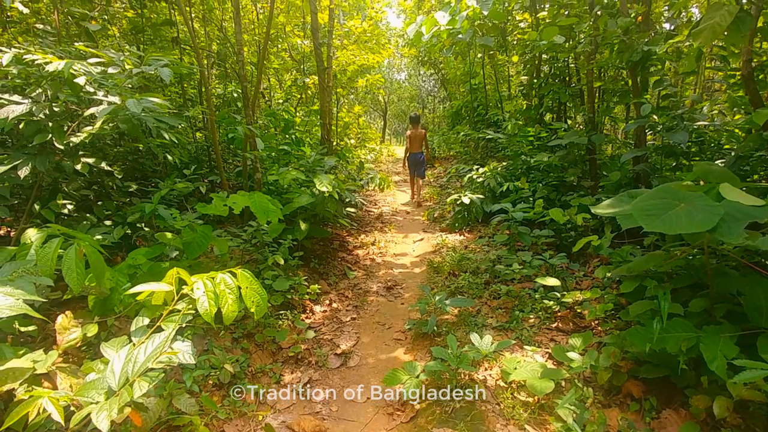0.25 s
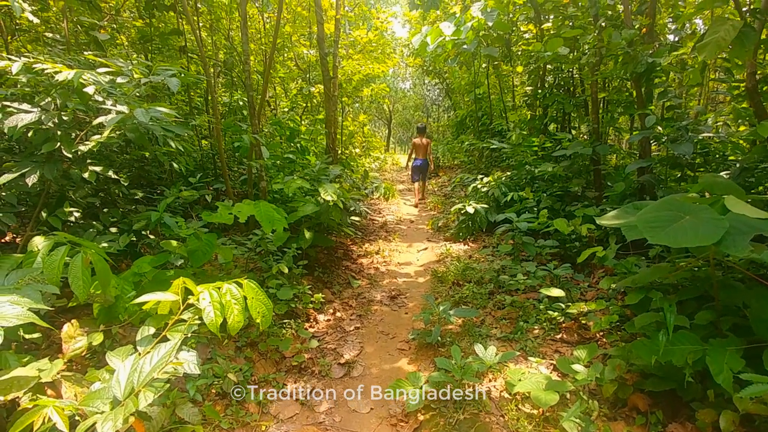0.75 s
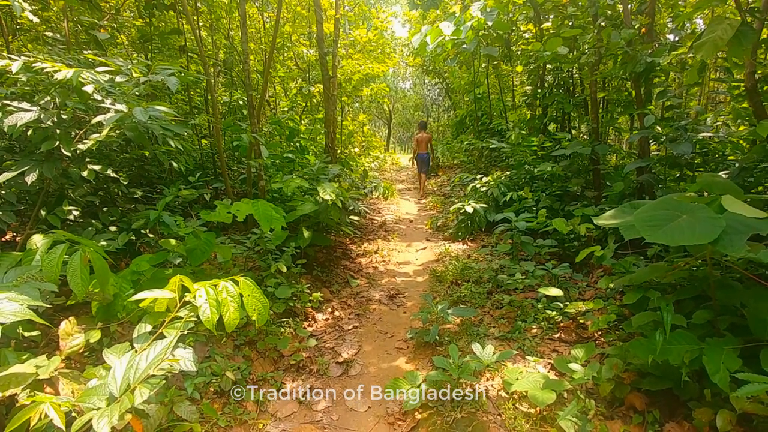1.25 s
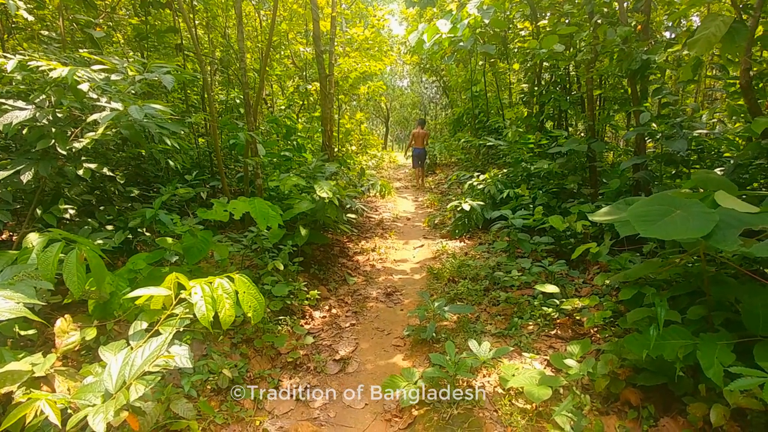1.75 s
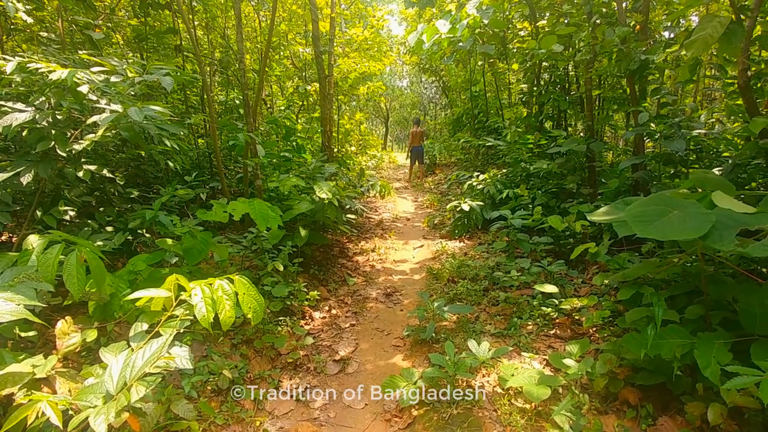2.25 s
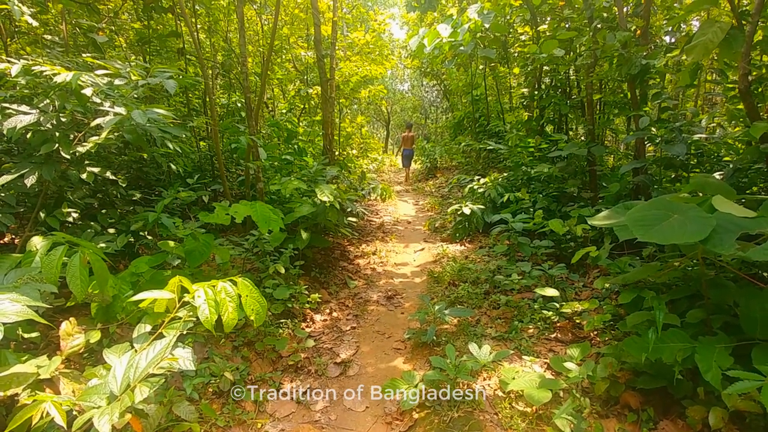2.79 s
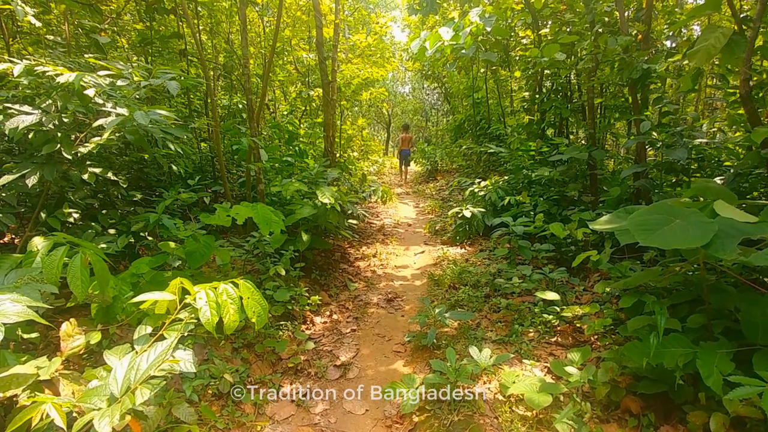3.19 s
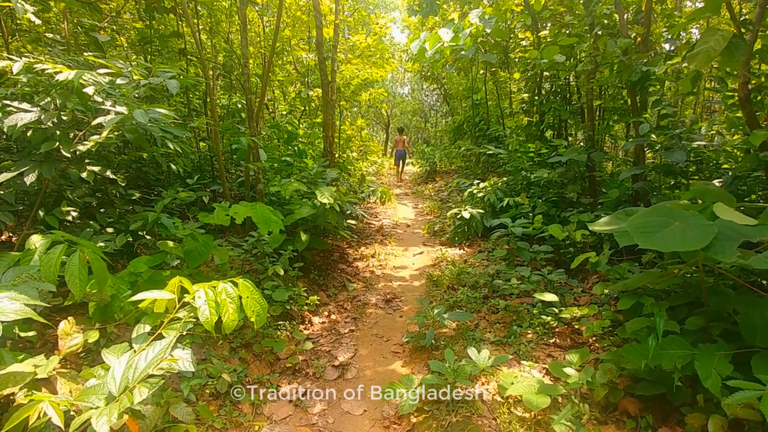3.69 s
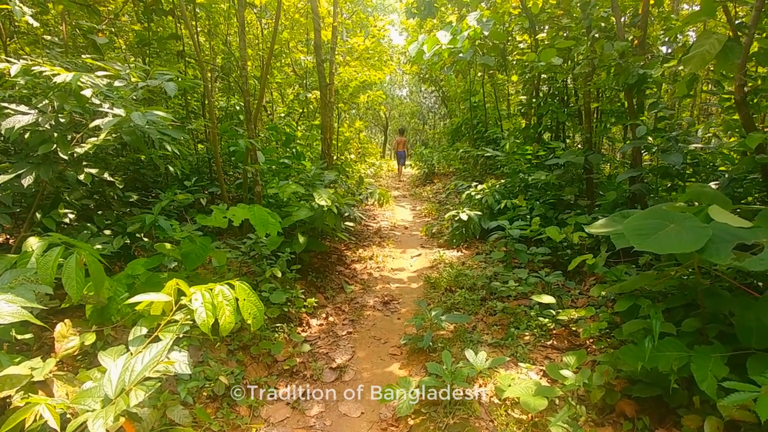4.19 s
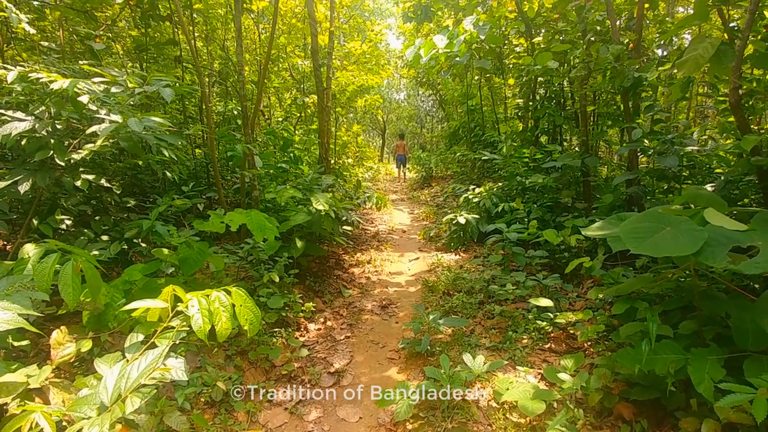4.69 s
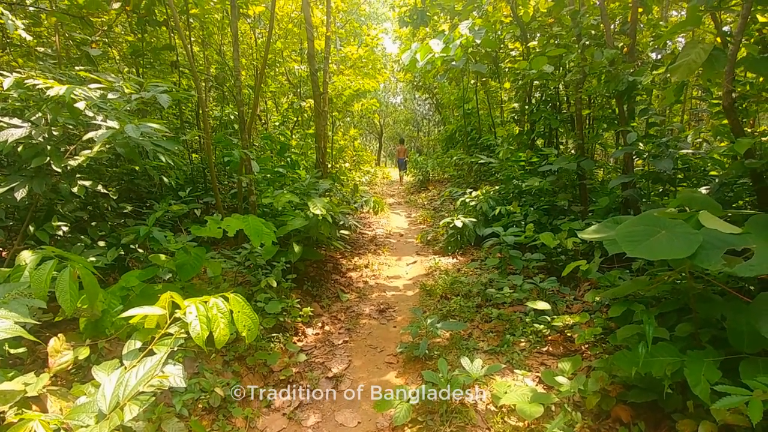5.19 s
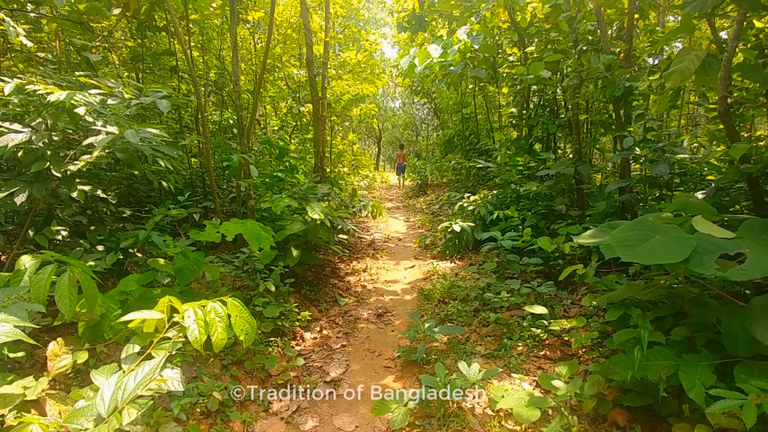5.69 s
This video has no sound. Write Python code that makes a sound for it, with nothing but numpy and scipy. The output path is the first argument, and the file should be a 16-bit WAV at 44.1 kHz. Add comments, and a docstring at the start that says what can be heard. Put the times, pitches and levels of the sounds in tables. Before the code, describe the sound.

A quiet wood beside a path, in stereo, about six seconds. A thin, shrill insect around 5 kHz throbs softly on the left, about seven pulses a second, over faint air and a low far rumble. At 0.7 s a cow begins a single low moo: fluttering and hoarse, it climbs to a clear, nasal, resonant hold from 1 to 1.6 s, then sinks and roughens, stopping near 1.9 s with a short tree echo. A wooden knock lands at 0.8 s; a faint hoarse bird whistle falls at 1.2 s. Dry leaves crackle left around 1.5 s, then sweep up to 2.3 s, where the strongest knock bounces and thuds. Very soft leaf steps follow. Insect bouts return at 1.5, 2.6 to 3.6, and 3.8 to 6 s. A soft husky coo comes at 3.5 s, a duller knock at 3.7 s, and a barely audible one at 5.4 s.

```python
"""First an insect throbs high on the left, then a cow moos once beside a forest path.
The moo climbs, holds clean, then sinks and turns rough: fold pulses ring a chain of throat resonances.
Dry leaves rustle on the left (shaped noise); one bird whistles down and another coos (gliding sines).
Wood knocks now and then with a dull thud (decaying modes and noise); the trees scatter the sound.
Under it all lie a low far rumble and a faint forest hush, both of shaped noise."""
import sys
import numpy as np
from scipy import signal
from scipy.fft import rfft, irfft, next_fast_len
from scipy.io import wavfile
from scipy.ndimage import uniform_filter1d, map_coordinates

SR = 44100
rng = np.random.default_rng(int(sys.argv[2]) if len(sys.argv) > 2 else 0)


def pcm_store(signal):
    """Save signal as 16-bit PCM."""
    levels = np.round(np.clip(np.atleast_2d(signal), -1, 1) * 32767)
    wavfile.write(sys.argv[1], SR, levels.astype(np.int16).T)


N = 262247

MOO_START, MOO_END = .67, 1.955  # s

# level of the fundamental while the folds are taut: t/s, level/dB
FUNDAMENTAL_LEVEL = [(.85, -51.5), (.93, -41), (1.15, -36), (1.7, -37.5), (1.9, -42)]
# sends of the four registers to the close trunks: level/dB
COW_TRUNK_SENDS = [-28, -15.5, -14, -7]
# sends of the four registers to the wider trees: level/dB
COW_TREE_SENDS = [-25.5, -15.5, -18, -18]
# stereo place of the cow: f/Hz, level left over right/dB
COW_PAN = [(700, -5), (1000, -4), (1200, -15.5), (1650, -10), (2300, -5.5), (4400, 5.5), (8000, 31)]


def cow(echo_db=-41, echo_hz=290, echo_width_hz=90, echo_flicker_db=4.5, echo_delay_s=.42):
    """The moo: four evened-out registers follow the effort, then reach the path through the trees."""
    phase = fold_phase()
    voice = bellow(phase)

    def register_bands(hz):
        below = [1 / (1 + (hz / edge) ** 40) for edge in (750, 950, 1270)]
        return np.diff(below, axis=0, prepend=0, append=1)

    registers = filtered(voice, register_bands)
    power = uniform_filter1d(registers ** 2, size=SR // 30, axis=1)
    strength = np.sqrt(np.abs(power) + 1e-12)
    registers = registers / strength * effort()
    sounding = during(MOO_START, MOO_END)
    fundamental = np.sqrt(2) * amp(curves(FUNDAMENTAL_LEVEL)[0]) * sounding * np.sin(phase)
    moo = registers.sum(axis=0) + fundamental + flaps(phase)

    # many near paths delay each upper frequency by its own milliseconds; the low pulses stay sharp
    paths = [(600, 0)] + [(hz, rng.uniform(-.002, .002)) for hz in np.arange(800, 10000, 200)]
    lead = np.array([[.0001], [-.0001]])  # s, left first

    def path_delays(hz):
        # a delay per frequency is the slope of the phase, so it is summed over frequency
        turns = np.cumsum(along(paths, hz) - lead, axis=1) * hz[1]
        return np.exp(-2j * np.pi * turns)

    def echo_band(hz):
        return np.exp(-2j * np.pi * hz * echo_delay_s - ((hz - echo_hz) / echo_width_hz) ** 2)

    direct = filtered(moo, path_delays)
    # a faint echo of the low hum comes back from far off, broken up and blurred by the trees
    echo = trees(filtered(moo, echo_band)) * amp(echo_db + echo_flicker_db * wobble(45))
    scatter = near_trunks(amp(COW_TRUNK_SENDS) @ registers) + trees(amp(COW_TREE_SENDS) @ registers)
    return placed(direct + scatter + echo, COW_PAN)


# chest, low mouth, high mouth and edge registers: held level/dB, attack t/s, attack curvature,
# swell level/dB, last push level/dB, release/dB per s
REGISTERS = [(-20.5, 0.41, 1.7, 2, 2.5, 222), (-32.5, .38, 1.6, -1.5, 1, 152),
             (-28, 0.38, 1.7, -2.5, 0.5, 178), (-34, 0.33, 1.27, 3, 4.5, 215)]
# ride on the low mouth register: t/s, level/dB
LOW_MOUTH_RIDE = [(.93, -12), (1.03, 3.5), (1.09, -7.5), (1.15, 3), (1.42, 0), (1.48, -6), (1.58, 4.5),
                  (1.68, -4), (1.76, 0), (1.87, -4.5)]
# ride on the high mouth register, around 1.1 kHz: t/s, level/dB
HIGH_MOUTH_RIDE = [(.87, -8), (.915, 0.5), (.94, -6.5), (1.01, 6), (1.06, -4), (1.11, 1), (1.27, -2),
                   (1.41, 2), (1.49, -3.5), (1.57, 5.5), (1.65, 10), (1.76, -5), (1.805, 6.5), (1.85, -2.5)]


def effort(release_at_s=1.856):
    """The gain of each register: attack, a hold that swells, a last push of air, release."""
    t = clock()
    swell, push = bump(1.31, .14), bump(1.793, .048)
    released = np.maximum(t - release_at_s, 0)
    gains = []
    for held_db, attack_s, curvature, swell_db, push_db, release in REGISTERS:
        attack = np.clip((t - MOO_START) / attack_s, 0, 1) ** curvature
        gains.append(attack * amp(held_db + swell_db * swell + push_db * push - release * released))
    chest, low, high, edge = gains
    low = low * amp(curves(LOW_MOUTH_RIDE)[0])
    high = high * amp(curves(HIGH_MOUTH_RIDE)[0])
    return np.array([chest, low, high, edge]) * during(MOO_START, MOO_END, edge_s=.025)


# the folds tighten, hold and slacken ever faster as the air runs out: t/s, f/Hz
FOLD_PITCH = [(0.68, 78), (0.82, 115.7), (0.904, 134), (.95, 139.8), (0.998, 143), (1.1, 146.4),
              (1.4, 146.3), (1.604, 142.6), (1.702, 137.8), (1.75, 131.9), (1.8, 124.3), (1.848, 114),
              (1.95, 67.9)]
# hoarseness of the folds: t/s, roughness 0-1
ROUGHNESS = [(.75, .6), (.85, .9), (.93, 0.27), (1.04, 0.09), (1.5, .075), (1.68, .16), (1.76, 0.45),
             (1.88, 0.94)]


def fold_phase(jitter=.0077):
    """The phase of the vocal folds' cycle; hoarse folds waver a little in pitch."""
    pitch, rough = curves(FOLD_PITCH)[0], curves(ROUGHNESS)[0]
    return 2 * np.pi * np.cumsum(pitch * (1 + jitter * rough * wobble(90))) / SR


# tone of the breath puffs inside the throat: f/Hz, level/dB
PUFF_TONE = [(50, -36), (400, -15), (800, 5), (1500, 6)]
# tone of the puffs rasping past the mouth: f/Hz, level before the rasp trim/dB
RASP_TONE = [(700, -26), (1250, -1.5), (1400, 3), (1490, 11.5), (1600, 3), (1900, 7.5), (2450, 0.5),
             (3200, -13), (4000, -28), (9000, -50.5)]
# moments when the bright band opens up: t/s, half width t/s, added gain (linear)
GAPES = [(1.0, .05, 2), (1.79, .08, 1.5)]


def bellow(phase, scatter_s=.00015, shimmer_db=2.3, breath=.67, rasp_db=-14, puff_depth=.63,
           bright_hz=2070, bright_width_hz=230):
    """One pulse per cycle rings the throat; hoarse pulses come unevenly and with a puff of breath."""
    rough = curves(ROUGHNESS)[0]
    # uneven timing blurs mostly the upper harmonics
    closing = phase + 2 * np.pi * curves(FOLD_PITCH)[0] * scatter_s * rough * wobble(160)
    pulses = unit(sum(np.cos(k * closing) for k in np.arange(2, 64)))
    puffs = rough * unit(rng.standard_normal(N) * (1 + puff_depth * np.cos(phase)) ** 2)

    def puff_colour(hz):
        in_throat = breath * amp(along(PUFF_TONE, hz)) * throat(hz)
        past_mouth = amp(rasp_db + along(RASP_TONE, hz))
        return in_throat + past_mouth

    def bright_band(hz):
        return np.exp(-((hz - bright_hz) / bright_width_hz) ** 2)

    hoarse = filtered(puffs, puff_colour)
    voiced = filtered(pulses * amp(shimmer_db * rough * wobble(120)), throat)
    gape = sum(gain * bump(s, width) for s, width, gain in GAPES)
    return voiced + gape * filtered(voiced + hoarse, bright_band) + hoarse


# resonances of the long throat and muzzle: f/Hz, width f/Hz, level/dB
THROAT_MODES = [(225, 80.6, 7.5), (510, 101.5, 1.5), (612, 65, 3.5), (884, 54.5, -3), (950, 54, -5.5),
                (1125, 57.2, 4.5), (1600, 71, -13.5), (1862, 100, -20), (2321, 110, -24.5),
                (4870, 134, -22.5), (7650, 180, -17.5)]
# dips cut by the nose: f/Hz, width f/Hz, depth 0-1
NASAL_DIPS = [(372.3, 44, 0.68), (437.3, 26, 0.83), (725, 50, 0.91), (1757, 30, .65)]
# overall slope of the voice: f/Hz, level/dB
VOICE_TILT = [(2400, -3.5), (2900, -12.5), (4500, -32), (10000, -40)]


def throat(hz):
    """Gain and phase of the airway: summed resonances of alternating sign, with nasal dips."""
    modes = 0
    for k, (centre, width, db) in enumerate(THROAT_MODES):
        damping = 1j * hz * width
        modes = modes + (-1) ** k * amp(db) * damping / (centre ** 2 - hz ** 2 + damping)
    dips = [1 - depth * np.exp(-((hz - centre) / width) ** 2) for centre, width, depth in NASAL_DIPS]
    return modes * np.prod(dips, axis=0) * amp(along(VOICE_TILT, hz))


# bouts of slack folds: t/s, half width t/s, level/dB
FLAP_BOUTS = [(0.784, .033, -34), (.865, 0.015, -38), (1.885, .035, -31)]


def flaps(phase, blunt_hz=250):
    """Slack folds slap shut with one blunt thump a cycle, too damped to ring the throat."""
    pulses = sum(np.cos(k * phase) for k in np.arange(1, 9))
    thumps = unit(filtered(pulses, lambda hz: 1 / (1 + 1j * hz / blunt_hz) ** 2))
    bouts = sum(amp(db) * bump(s, width) for s, width, db in FLAP_BOUTS)
    return thumps * bouts * during(MOO_START, MOO_END)


def near_trunks(x, t60=.24):
    """Close trunks throw back a short, dense cluster of echoes, unrelated left and right."""
    t = np.arange(SR // 3) / SR
    tail = rng.standard_normal((2, len(t))) * amp(-60 * t / t60) * (1 - np.exp(-t / .01))
    return signal.fftconvolve(x[None], tail / np.linalg.norm(tail[0]), axes=1)[:, :N]


# blows on wood that chatter as they settle: t/s, pitch ratio, knock level/dB, scrape level/dB,
# clatter level/dB, thud level/dB, thud delay t/s, bounce gap t/s, loss a bounce/dB
KNOCKS = [(.835, 0.91, -27.5, -38, -41, -27.5, 0.007, .012, 8.5),
          (2.329, 1.06, -21.5, -27.5, -43, -25, 0.0095, 0.016, 12),
          (3.685, .96, -30.5, -35, -34, -33, .045, 0.013, 3),
          (5.392, 1, -74, -78, -56, -45, 0.0032, 0.014, 17)]
# ringing modes of the wood: f before the pitch ratio/Hz, mean level/dB, t60 t/s
WOOD_MODES = [(377, -7, 0.026), (577, -12.5, 0.061), (946, 5, 0.022), (1051.5, -11, 0.071)]
# rough scrape at each contact: f/Hz, level/dB
SCRAPE_TONE = [(50, -27.5), (200, -12.5), (700, -4.5), (1200, 5.5), (2200, -3), (6000, -44)]
# dull rattle of the wood: f/Hz, level/dB
CLATTER_TONE = [(100, -0.5), (210, 2.5), (320, -5.5), (580, 0), (900, -9), (2000, -42.5)]


def knocks(thud_hz=70, thud_drop_hz=95, thud_drop_s=.02, thud_t60=.12, scrape_t60=.082,
           wet_db=-4, uneven_db=2.5, contacts=4):
    """Each blow bounces; every contact rings, scrapes and rattles the wood; the ground thuds once."""
    t = np.arange(SR // 2) / SR
    attack = 1 - np.exp(-t / .0012)
    thud_pitch = thud_hz + thud_drop_hz * np.exp(-t / thud_drop_s)
    thud = amp(-60 * t / thud_t60) * np.sin(2 * np.pi * np.cumsum(thud_pitch) / SR) * attack
    rub = amp(-60 * t / scrape_t60) * (1 - np.exp(-t / .0056))

    def span(s):
        first = round(s * SR)
        return slice(first, first + len(t))

    def ring(pitch):
        # every contact excites the modes a little differently
        return sum(amp(db + rng.normal(0, 3.6) - 60 * t / t60) * np.sin(2 * np.pi * pitch * hz * t)
                   for hz, db, t60 in WOOD_MODES)

    wood, scrape, clatter = np.zeros((3, N))
    for s, pitch, knock_db, scrape_db, clatter_db, thud_db, thud_delay, bounce, loss_db in KNOCKS:
        wood[span(s + thud_delay)] += amp(thud_db) * thud
        for k in range(contacts):
            contact, force = span(s + k * bounce), amp(-k * loss_db)
            wood[contact] += force * amp(knock_db) * ring(pitch) * attack
            scrape[contact] += force * amp(scrape_db) * rub
            clatter[contact] += force * amp(clatter_db) * rub
    scrape = scrape * rush(SCRAPE_TONE, grain_db=6)
    answer = amp(wet_db + uneven_db * wobble(150)) * trees(scrape)
    return from_path(wood + scrape + clatter * rush(CLATTER_TONE) + answer)


# tone of the crackling leaf edges: f/Hz, level/dB
CRISP_TONE = [(2000, -14), (6500, -7.5), (7700, -1), (8600, -8), (10800, -33), (12500, -21.5),
              (15500, -20.5)]
# tone of whole leaves bending: f/Hz, level/dB
LEAF_BODY_TONE = [(300, -24.5), (900, -15), (2700, -5), (6000, -22), (9000, -44)]
# stereo place of the leaves: f/Hz, level left over right/dB
LEAF_PAN = [(1200, -9), (2000, -4), (3000, 5.5), (8000, 26), (13000, 0.5)]


def leaves(crisp_trim_db=-3, body_trim_db=-3, wet_db=-12):
    """Dry leaves crackle at their edges; whole leaves bend and sound lower."""
    crisp, body = leaf_strokes()
    edges = amp(crisp_trim_db) * crisp * rush(CRISP_TONE, grain_db=2.5)
    bending = amp(body_trim_db) * body * rush(LEAF_BODY_TONE, grain_db=2.5)
    rustle = edges + bending
    return placed(rustle + amp(wet_db) * trees(rustle), LEAF_PAN)


# all stroke levels are before the crisp and body trims
# brushes against dry leaves: t/s, crisp level/dB, body level/dB, fall t/s
BRUSHES = [(.84, -57, -51.5, 0.31), (1.059, -39.5, -72, .06), (1.481, -32, -37.5, .09),
           (1.525, -33, -43, .05), (1.61, -42.5, -75, .045), (2.347, -35, -45, 0.028),
           (2.401, -43.5, -51, 0.079), (3.672, -75, -58.5, 0.091), (3.708, -52, -48.5, 0.13),
           (4.61, -63, -70, .13), (4.76, -81, -68, .2)]
# a long sweep through the leaves: start t/s, peak t/s, fall t/s
SWEEP = (2.03, 2.295, .06)
# peak of the sweep, crisp and body: level/dB
SWEEP_PEAKS = [-32, -34]
# growth of the sweep, crisp and body: rise/dB per s
SWEEP_GROWTH = [68, 103]
# first soft step in the leaf litter, crisp and body: level/dB
STEP_LEVELS = [-54.5, -65]
# loss at each next step, crisp and body (negative grows): level/dB
STEP_LOSSES = [5.5, -2.5]


def leaf_strokes(rise_share=.36, step_at_s=2.575, step_gap_s=.383, step_s=.15, steps=3):
    """Crisp and body gains of the brushes, the long sweep and the soft steps, summed as power."""
    strokes = []
    for s, crisp_db, body_db, fall in BRUSHES:
        strokes.append(np.outer(amp([crisp_db, body_db]), stroke(s, rise_share * fall, fall)))
    start, peak, fall = SWEEP
    strokes.append([amp(db) * stroke(peak, 20 / growth, fall) * during(start, N / SR)
                    for db, growth in zip(SWEEP_PEAKS, SWEEP_GROWTH)])
    for k in range(steps):
        step = stroke(step_at_s + k * step_gap_s, step_s, step_s)
        strokes.append(np.outer(amp(STEP_LEVELS) / amp(STEP_LOSSES) ** k, step))
    return np.sqrt(sum(np.square(gains) for gains in strokes))


# a soft coo: t/s, f/Hz, level/dB
COO = [(3.45, 334.8, -51.5), (3.512, 371, -47.5), (3.548, 336.8, -41.5), (3.595, 320.4, -42.5),
       (3.635, 352.6, -45.5), (3.712, 387, -35.5), (3.725, 360, -46)]


def coo(overtone_db=-18, ring_hz=725, ring_width_hz=50, haze_db=-26, wet_db=-22):
    """A soft, husky note; its overtone sounds out when it meets the bird's throat resonance."""
    hz, db = curves(COO)
    phase = 2 * np.pi * np.cumsum(hz * (1 + .0028 * wobble(65))) / SR
    resonance = 1 / np.hypot(1, (2 * hz - ring_hz) / ring_width_hz) ** 2
    overtone = amp(overtone_db) * resonance * np.sin(2 * phase)
    haze = amp(haze_db) * (wobble(260) * np.sin(phase) + .5 * wobble(260) * np.sin(2 * phase))
    envelope = np.sqrt(2) * amp(db) * during(COO[0][0], COO[-1][0])
    note = envelope * (np.sin(phase) + overtone + haze)
    return from_path(note + amp(wet_db) * trees(note))


def whistle(start_s=1.205, length_s=.19, first_hz=4120, fall_octaves_per_s=2.5,
            level_db=-45.5, fade_db_per_s=22, attack_s=.035, wet_db=-3):
    """A hoarse bird note, left of centre, that falls and fades evenly, smeared by the foliage."""
    t = np.maximum(clock() - start_s, 0)
    hz = first_hz * 2 ** (-fall_octaves_per_s * t)
    phase = 2 * np.pi * np.cumsum(hz * (1 + .04 * wobble(700))) / SR
    attack = np.minimum(t / attack_s, 1) ** 2
    envelope = attack * amp(level_db - fade_db_per_s * t) * during(start_s, start_s + length_s)
    note = np.sqrt(2) * envelope * np.sin(phase)
    return (note + amp(wet_db) * trees(note)) * amp([[2.5], [-2.5]])


# the other insects: t/s, level/dB
CHORUS_LEVEL = [(1.2, -52), (2.5, -49), (3.9, -52)]
# narrow shrill band: f/Hz, level/dB
SHRILL_TONE = [(3500, -68.5), (4650, -25.5), (5250, 3), (5850, 1), (6300, -21), (9500, -84.5)]
# throbbing by the nearest insect: first throb t/s, length t/s, throbs a second, level before the trim/dB
THROB_BOUTS = [(0.037, .76, 6.6, -43.5), (1.484, .35, 6.8, -35), (2.604, 1.02, 7.42, -36.5),
               (3.774, 2.2, 7.12, -35.5)]


def insects(throb_trim_db=-9.5, right_cut_db=14, uneven_db=1, throb_half_width_s=.018):
    """A narrow shrill, over which one insect throbs in bouts, about seven times a second."""
    power = amp(curves(CHORUS_LEVEL)[0]) ** 2
    for start, length, rate, db in THROB_BOUTS:
        times = start + np.arange(0, length, 1 / rate)
        throbs = sum(bump(s, throb_half_width_s) for s in times)
        power = power + amp(db + throb_trim_db + uneven_db * wobble(2.7)) ** 2 * throbs
    flicker = amp(wobble(100))  # about 1 dB
    return np.sqrt(power) * rush(SHRILL_TONE) * flicker * amp([[0], [-right_cut_db]])


# far rumble: t/s, level/dB
RUMBLE_LEVEL = [(.5, -52.5), (.8, -43), (1.3, -47.5), (1.95, -45.5), (2.5, -58.5)]
# tone of the rumble: f/Hz, level/dB
RUMBLE_TONE = [(30, -39.5), (65, 1.5), (92, 7.5), (125, -0.5), (400, -52)]
# tone of the forest hush: f/Hz, level/dB
AIR_TONE = [(40, -38.5), (150, -6.5), (600, -13), (2500, -21.5), (8000, -26.5), (9500, -33), (11000, -59.5)]


def background(air_db=-66):
    """An uneven far rumble under the faint hush of the forest, both shaped noise."""
    rumble = amp(curves(RUMBLE_LEVEL)[0] + 1.4 * wobble(23)) * rush(RUMBLE_TONE)
    hush = amp(air_db + 1.32 * wobble(.82)) * rush(AIR_TONE)
    return from_path(rumble + hush)


# decay among the trees: f/Hz, t60 t/s
TREE_DECAY = [(200, 0.69), (1200, 0.53), (3000, 0.32), (9000, 0.078)]


def trees(x):
    """Trunks and leaves scatter a sound into a tail whose treble dies first."""
    hz, t, grid = signal.stft(rng.standard_normal((2, SR)), SR, nperseg=256)
    decay = amp(-60 * t / along(TREE_DECAY, hz)[:, None]) * (1 - np.exp(-t / .0055))
    tail = signal.istft(grid * decay, SR, nperseg=256)[1]
    return diffuse(signal.fftconvolve(np.atleast_2d(x), tail / np.linalg.norm(tail[0]), axes=1)[:, :N])


# stereo place of sounds from the path: f/Hz, level left over right/dB
PATH_PAN = [(1500, -6), (3000, -1), (8000, 3)]


def from_path(x, left_lead_s=.0002):
    """A sound from the path ahead, a little earlier on the left."""
    sides = np.array([[1], [-1]])
    return filtered(placed(x, PATH_PAN), lambda hz: np.exp(1j * np.pi * hz * left_lead_s * sides))


# likeness of left and right in a sound from all round: f/Hz, likeness 0-1
LIKENESS = [(100, 0.96), (500, 0.78), (1400, 0.042), (3000, 0.051)]


def diffuse(pair):
    """Two unrelated signals become a sound from all round: alike in the bass, unrelated in the treble."""
    def mid_side(hz):
        turn = np.arccos(np.clip(along(LIKENESS, hz), -1, 1)) / 2
        return np.array([np.cos(turn), np.sin(turn)])
    mid, side = filtered(pair, mid_side)
    return np.array([mid + side, mid - side])


def rush(spectrum, grain_db=0):
    """Stereo noise of rms 1; grain_db breaks it into crackles about a millisecond long."""
    noise = rng.standard_normal((2, N)) * amp(grain_db * wobble(900))
    return unit(filtered(diffuse(noise), lambda hz: amp(along(spectrum, hz))))


def placed(x, pan):
    """Share each frequency between left and right, keeping its power."""
    def sides(hz):
        gains = amp(along(pan, hz) * np.array([[.5], [-.5]]))
        return gains / np.sqrt(np.mean(gains ** 2, axis=0))
    return filtered(x, sides)


def filtered(x, response):
    """x times a complex response of frequency."""
    size = next_fast_len(N + SR // 2)
    return irfft(rfft(x, size) * response(np.fft.rfftfreq(size, 1 / SR)), size)[..., :N]


def stroke(s, rise, fall):
    """A swell that grows 20 dB over its rise, peaks at s and loses 20 dB over its fall."""
    t = clock() - s
    return amp(-20 * np.minimum(np.maximum(-t / rise, t / fall), 10))


def bump(s, width):
    """A bell-shaped swell of height 1 around time s."""
    return np.exp(-.5 * ((clock() - s) / width) ** 2)


def during(start, end, edge_s=.014):
    """A gate that is open from start to end, with soft edges outside."""
    return np.clip(np.minimum(clock() - start, end - clock()) / edge_s + 1, 0, 1)


def wobble(rate):
    """A smooth random curve, rate knots a second."""
    knots = rng.standard_normal(int(N * rate / SR) + 4)
    return map_coordinates(knots, [np.arange(N) * rate / SR])


def curves(rows):
    """One value per sample for each column after the time."""
    s, *columns = np.transpose(rows)
    return [np.interp(clock(), s, column) for column in columns]


def along(points, hz):
    """(f/Hz, value) points read on a log frequency axis."""
    f, value = np.transpose(points)
    return np.interp(np.log(hz + 1), np.log(f + 1), value)


def clock():
    """The time of every sample in seconds."""
    return np.arange(N) / SR


def unit(x):
    """Scale to rms 1."""
    return x / np.sqrt(np.mean(x ** 2) + 1e-20)


def amp(db):
    """Decibels to gain."""
    return 10 ** (np.asarray(db) / 20)


def scene():
    """Everything heard from the path."""
    return cow() + knocks() + leaves() + coo() + whistle() + insects() + background()


def record(dry, top_hz=15750):
    """Nothing is kept above the band limit."""
    return filtered(dry, lambda hz: hz < top_hz)


dry = scene()
out = record(dry)
pcm_store(out)
```